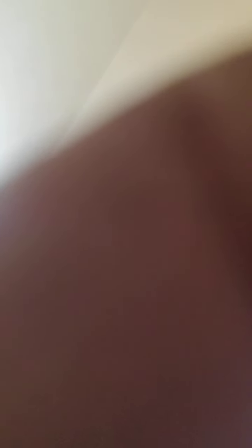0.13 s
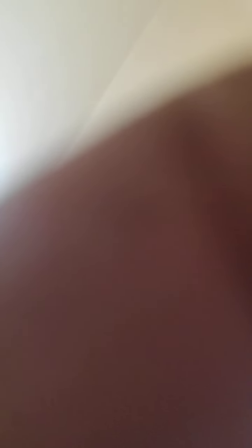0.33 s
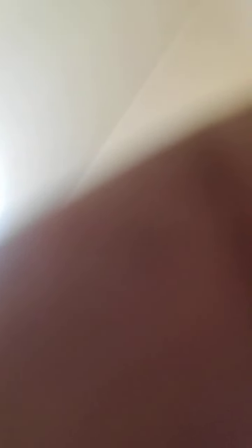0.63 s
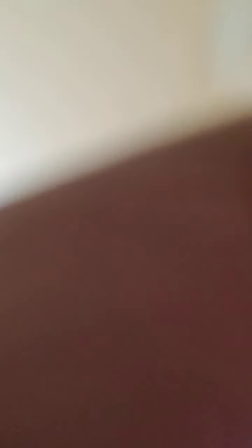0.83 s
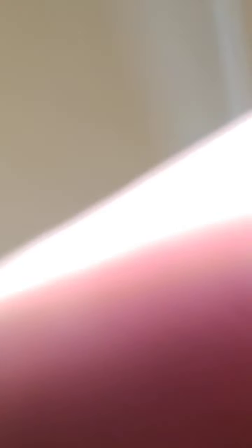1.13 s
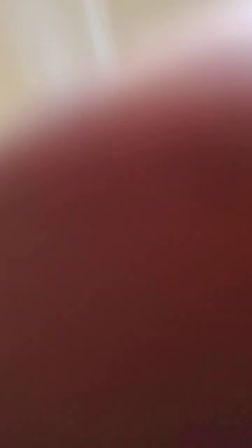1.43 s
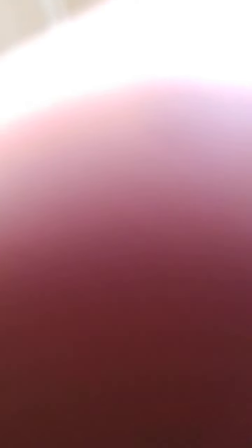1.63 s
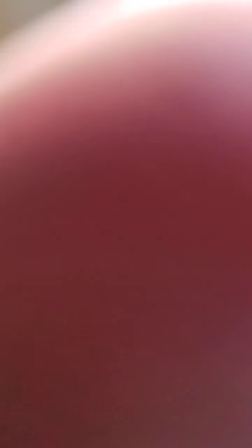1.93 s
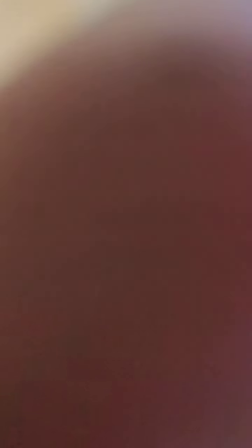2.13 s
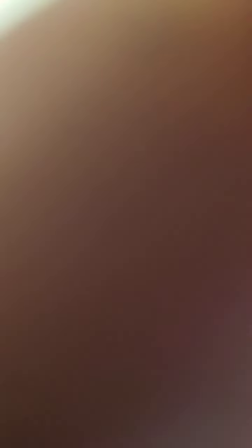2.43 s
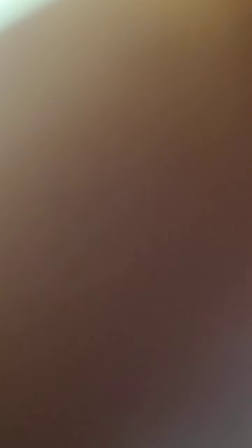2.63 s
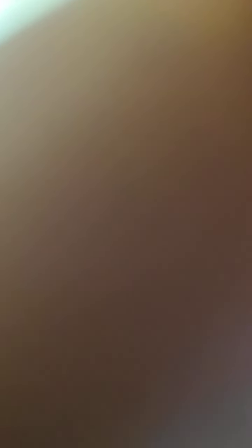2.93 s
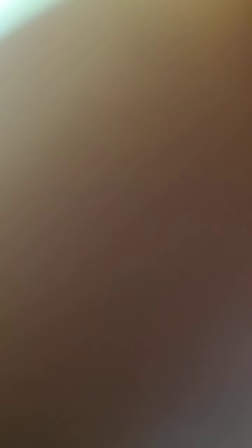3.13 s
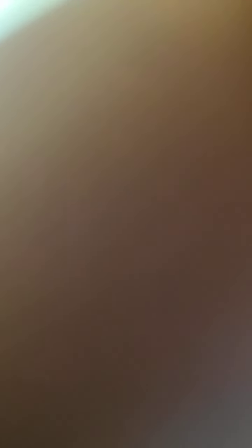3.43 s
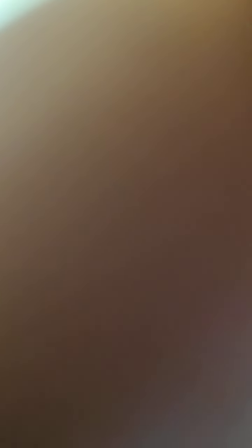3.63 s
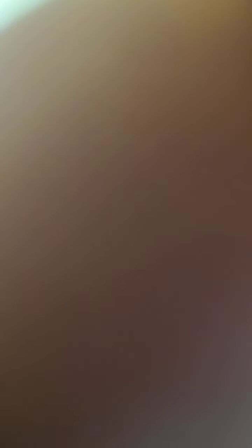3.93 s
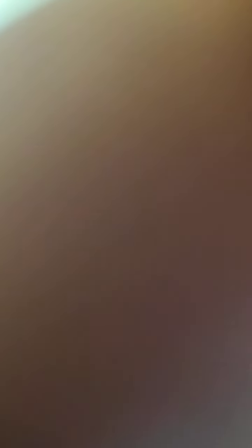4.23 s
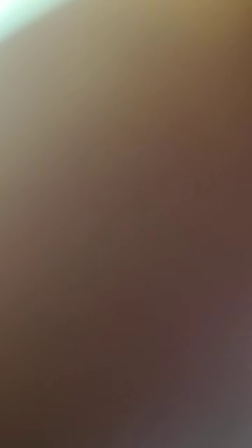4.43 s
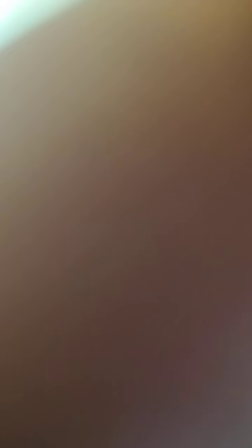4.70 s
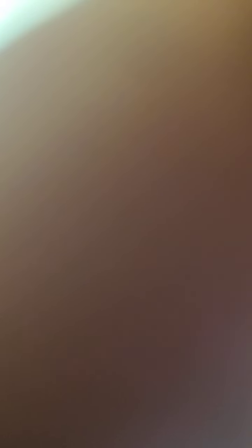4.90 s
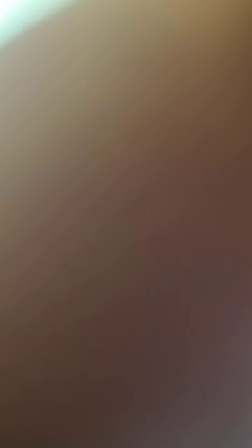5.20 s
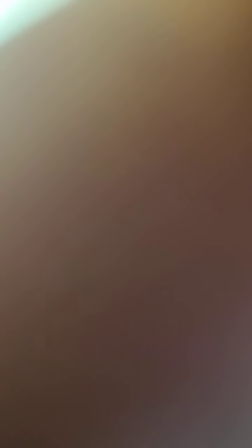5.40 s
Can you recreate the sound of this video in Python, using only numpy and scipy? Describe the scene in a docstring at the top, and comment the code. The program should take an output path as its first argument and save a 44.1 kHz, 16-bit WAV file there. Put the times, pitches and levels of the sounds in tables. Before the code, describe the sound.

A folding knife snaps loudly close by, then gives lighter metal clicks and ticks, over soft handling rustle and a faint room hum.

```python
"""Folding knife in a small hard room

A knife is snapped and handled close to a phone's two microphone ports. Each click is a burst of tiny
metal contacts ringing the knife, and the walls return it. The handle knocks on the hand, the pivot
grates, fingers rustle, a palm drags on the phone and air puffs on the left port.
Behind it, mains hum and a far engine sit in the room's low rumble."""
import sys
import numpy as np
from scipy import signal
from scipy.fft import rfft, irfft
from scipy.io import wavfile
from scipy.ndimage import uniform_filter1d

SR = 44100
rng = np.random.default_rng(int(sys.argv[2]) if len(sys.argv) > 2 else 0)


def unload_wav(signal):
    """Save mono or channel-first audio to the path in sys.argv[1] as 16-bit WAV at rate SR, clipped to [-1, 1]."""
    wavfile.write(
        sys.argv[1],
        SR,
        np.round(np.clip(np.atleast_2d(signal).T, -1, 1) * 32767).astype(np.int16),
    )


N = 245195

# Knife clicks, close up. Each row: start in seconds, level in dB, left minus right in dB, thud, handle
# and edge in dB against the blade's ring, loudest ring in Hz, steel ping in Hz, seconds for the contacts
# to fall 60 dB, room send in dB.
CLICKS = [(0.2646, -61.5, 0, 6, 3, 2, 8600, 3200, 0.005, -11.5),
          (1.2059, -11, 9, -27.5, -11, -6.5, 7650, 4910, 0.0088, -22.5),
          (1.26, -7.5, -2, -35, -12, -2.5, 6830, 4560, 0.0078, -21.5),
          (1.269, -11, -6, -38, -29, -12.5, 7000, 6900, .0042, -42),
          (1.5802, -6, -2, -22, -19.5, -1.5, 7500, 3970, .0055, -22.5),
          (1.5847, -13, -13, -35, -24, -16.5, 6090, 4600, 0.0031, -15.5),
          (1.5862, -12, -13.5, -44, -30, -15, 7300, 4600, .0035, -29.5),
          (1.924, -47.5, 3.5, -33.5, -20.5, -0.5, 5740, 5400, 0.0065, -18),
          (2.0594, -43, -0.5, -20, -8, -16, 5480, 3270, 0.0059, -19.5),
          (2.065, -46, 4, -14, -26.5, -10.5, 5530, 5200, 0.0076, -18.5),
          (2.0973, -44, 1.5, -20, -17, -5, 8300, 3260, 0.0052, -34),
          (2.197, -54, -2, -21, -14.5, -7, 5800, 3900, .025, -14.5),
          (2.3885, -52.5, 3, -6.5, -17.5, -4, 7900, 3905, 0.014, -17.5),
          (2.7206, -50.5, 1, -13.5, -21, -9, 7530, 4790, 0.006, -17),
          (2.8876, -54.5, 2, -10.5, -22, -1.5, 8580, 3300, 0.0085, -12.5),
          (3.1736, -50, -1.5, -18.5, -7, -22.5, 5500, 4550, 0.0071, -17),
          (3.9322, -23, 6, -19, -12, -11, 7140, 6900, 0.0067, -21),
          (3.9449, -28, 13, -17.5, -22, -10.5, 7060, 4400, 0.004, -14),
          (3.948, -32, 10, -24, -30, -23, 7140, 3700, 0.0063, -25),
          (4.1326, -22, 8.5, -14, -19, -10.5, 6030, 4400, 0.0081, -19),
          (4.139, -34, 0, -13, -12, -27, 5800, 5100, 0.0054, -12.5),
          (4.2516, -39.5, 6, -6, -11.5, -10, 5800, 5210, 0.02, -5.5),
          (4.271, -35.5, 7, -13, -7.5, -4, 7200, 4400, 0.013, -10.5),
          (4.3746, -44, 10, 3, 3.5, -5.5, 4680, 4940, 0.011, -9),
          (4.4718, -49, 5, -39, -24.5, -9, 6980, 3880, 0.0067, -17),
          (4.666, -39.5, -2.5, -37, -27, -3, 9010, 3880, 0.011, -17.5),
          (4.683, -39.5, -2, -44, -25, -17.5, 7250, 3850, .0091, -21.5),
          (4.868, -57.5, -1.5, -21.5, -11, -15, 7930, 3870, 0.03, -25.5),
          (5.1635, -32.5, -1, -35, -30, -1, 7400, 3350, 0.0086, -18.5),
          (5.176, -48, -20.5, -19.5, -24.5, -13, 7310, 5140, 0.0056, -14),
          (5.3987, -43.5, -3, -28.5, -21, -3, 7300, 4000, 0.01, -18),
          (5.432, -49.5, 3, -35, -10, -8, 5250, 5530, 0.035, -14),
          (5.464, -41, 0, -19, -14.5, -14, 7900, 6970, .028, -15.5)]
# Resonances of a click as the ports hear it. Each row: centre in Hz, width in Hz, relative level in dB.
BLADE_MODES = [(3900, 900, -9.5), (5800, 2300, -7), (7304, 1600, -0.5), (8880, 1650, -6)]
EDGE_MODES = [(11100, 2400, -7.5), (12000, 1100, -9.5), (13800, 400, 0.5)]
HANDLE_MODES = [(1203, 1480, -2), (1734, 250, 0), (2706, 930, -7.5), (3300, 480, -7.5)]
HAND_THUD_MODES = [(171.5, 580, 4), (400, 600, -1.1), (800, 67, -6.5)]
# Decay of the walls' return. Each row: frequency in Hz, time to fall 60 dB as a multiple of ROOM_BASE_S.
ROOM_DECAY = [(300, 1.4), (1000, 1.6), (2000, 1.9), (4000, 2.02), (7500, 1.81), (14000, 1.83)]
# Tone of the walls' return. Each row: frequency in Hz, gain in dB.
ROOM_COLOUR = [(300, 1.5), (1000, -6.5), (3000, 2), (7500, -4), (11000, 0.5), (14000, -2)]
# The holding hand shades the ports from the room. Each row: time in seconds, left minus right in dB.
HAND_SHADE = [(.3, 2), (1.2, -3), (1.27, -3), (1.58, -12), (1.92, 2), (2.4, -3), (3.2, -4), (3.94, -3),
              (4.14, -3), (4.27, -2), (4.68, -5.5), (5.17, -1), (5.46, -5)]
# The handle knocks on the hand. Each row: start in seconds, peak in dB, pitch in Hz, left minus right in dB.
KNOCKS = [(1.129, -58, 400, 15), (1.393, -48.5, 595, 13), (3.943, -44, 112, 6), (4.3755, -35, 1130, -4),
          (5.356, -52, 930, 2), (5.458, -51, 800, 3)]
# The pivot grates as the blade turns. Each row: start in seconds, hold in seconds, level in dB.
PIVOT_GRATES = [(3.35, 0.037, -80), (4.64, .03, -76.5), (4.684, .004, -67.5), (4.865, 0.018, -78),
                (5.17, 0.012, -70), (5.21, 0.018, -69.5), (5.31, .004, -75.5), (5.398, 0.094, -71)]
# The pivot's resonances. Each row: centre in Hz, width in Hz, relative level in dB.
PIVOT_MODES = [(1840, 156, 1), (2350, 230, -10), (4070, 110, -10.5), (6050, 770, -3)]
# Fingers and cloth rub. Each row: start in seconds, hold in seconds, level in dB, left minus right in dB.
RUSTLE_STROKES = [(.268, 0.093, -67.5, -0.5), (.41, 0.18, -75, -1), (.55, 0.28, -66, 0),
                  (.86, 0.19, -64.5, 0.5), (1.11, 0.12, -60.5, 0), (1.54, 0.066, -61, 4.5),
                  (1.77, 0.066, -64, 7.5), (3.335, 0.044, -66.5, -1), (2.165, .02, -71, -5.5),
                  (4.48, 0.12, -73.5, -2), (5.36, .03, -72, -2)]
# Tone of the rubbing. Each row: frequency in Hz, relative level in dB.
RUSTLE_COLOUR = [(710, -49), (1200, -5.5), (1290, -17), (1400, -9), (3370, -8.5), (4510, -5.5), (8040, -3),
                 (14200, -10.5)]
# The palm drags along the phone. Each row: start in seconds, hold in seconds, level in dB.
PALM_DRAGS = [(2.32, 0.068, -75)]
# Air on the ports. Each row: start in seconds, hold in seconds, level in dB before each port's gain.
AIR_PUFFS = [(.97, 0.024, -52.5), (1.045, 0.017, -49), (1.095, 0.012, -45), (1.14, 0.014, -50),
             (1.24, 0.059, -60.5), (1.98, 0.052, -62), (2.11, .02, -54), (2.19, 0.0076, -58.5),
             (2.44, .04, -61), (2.61, 0.046, -61)]
# The far engine. Each row: time in seconds, pitch in Hz, level in dB, level at half the pitch in dB.
ENGINE = [(.75, 128, -83, -71), (.9, 127, -65, -71), (1.5, 132, -66.5, -65), (1.7, 133, -73.5, -65),
          (2.2, 134, -67, -66), (2.8, 139, -73, -73.5), (3.8, 145, -82.5, -66.5),
          (4.2, 141.5, -85.5, -75.5), (4.6, 134, -87, -69), (5.2, 135.7, -89.5, -67.5),
          (5.5, 136, -83.5, -73.5)]
# Mains hum. Each row: frequency in Hz, rms level in dB.
MAINS_LINES = [(150, -73), (200, -72)]
# Rumble and hiss of the room tone. Each row: frequency in Hz, relative level in dB.
FLOOR_COLOUR = [(8.8, -35), (15, -1), (144, -12), (172, -19), (204, -15.5), (222, -16), (249, -15),
                (372, -21), (556, -25.5), (807, -28.5), (1210, -33.5), (14200, -37.5)]
# How alike the ports hear the room tone. Each row: frequency in Hz, likeness from 0 to 1.
FLOOR_LIKENESS = [(60, 0.72), (130, 0.9), (290, 0.7), (630, 0.3), (1370, 0)]
# Balance of the room tone. Each row: frequency in Hz, left minus right in dB.
FLOOR_BALANCE = [(60, -1.5), (110, -1.5), (200, 4), (370, 3.5), (680, 1), (1260, 2.5), (2310, 0.5),
                 (4250, 0), (7820, -3), (14400, 4.5)]

SIDES = np.array([[1], [-1]])  # left, right
SPAN, LEAD = 1 << 14, 256  # samples: one click with its tail, the lead-in to its first contact
RISE_SHARE = 0.11  # rise time over contact decay time: softer, longer contacts build up more slowly
BOUNCE_DB, BOUNCE_STRETCH = -19, 4.06  # small rebounds: level, how many times longer they last
SHARED_CONTACTS, RIGHT_LAG_S = 0.13, 0.0004  # the ports face different parts of the knife
LOUDEST_WIDTH_HZ, LOUDEST_DB, LOUDEST_ROOM_DB = 580, 5, 0.5  # this ring stands out less off the walls
EDGE_T60_S, EDGE_LEFT_DB = 0.0055, 6  # the brightest part is brief and beams at the left port
PING_T60_S, PING_DB = 0.02, -11.5
EDGE_ROOM_DB, THUD_ROOM_DB = -8, -8.5  # the thud travels in the hand, so less reaches the walls
ROOM_BASE_S, ROOM_ONSET_S, TAIL_BEND = 0.18, 0.0014, 0.98
ENGINE_THIRD_DB, FLOOR_DB = -72.5, -63


def knife_clicks():
    """Close up, tiny contacts and rebounds ring the blade and jolt the hand; the walls answer."""
    out = np.zeros((2, N))
    t = np.maximum(np.arange(SPAN) - LEAD, 0) / SR
    edge_modes = resonances(EDGE_MODES)
    for s, db, pan_db, thud_db, handle_db, edge_db, ring_hz, ping_hz, t60, room_db in CLICKS:
        rise = 1 - np.exp(-(t / (RISE_SHARE * t60)) ** 2)
        envelope = rise * (undb(-60 * t / t60) + undb(BOUNCE_DB - 60 * t / t60 / BOUNCE_STRETCH))
        common, *own = rng.standard_normal((3, SPAN))
        contacts = np.sqrt(SHARED_CONTACTS) * common + np.sqrt(1 - SHARED_CONTACTS) * np.array(own)
        blade = resonances(BLADE_MODES + [(ring_hz, LOUDEST_WIDTH_HZ, LOUDEST_DB)])
        ring = irfft(rfft(contacts * envelope) * blade)
        ring /= np.linalg.norm(ring, axis=1, keepdims=True)
        edge = irfft(rfft(common * rise * undb(-60 * t / EDGE_T60_S)) * edge_modes)
        edge = edge / np.linalg.norm(edge) * panned(edge_db, EDGE_LEFT_DB)
        ping = rise * undb(-60 * t / PING_T60_S) * np.sin(2 * np.pi * ping_hz * t)  # the blade's free part
        ping *= undb(PING_DB) / np.linalg.norm(ping)
        handle = undb(handle_db) * resonances(HANDLE_MODES)
        thud = undb(thud_db) * resonances(HAND_THUD_MODES)
        push = np.roll(irfft(np.hypot(handle, thud)), LEAD + int(RISE_SHARE * t60 * SR))
        click = np.linalg.norm(envelope) * (ring + edge + ping + push)
        click[1] = np.roll(click[1], int(RIGHT_LAG_S * SR))
        mix_in(out, s - LEAD / SR, click * panned(db, pan_db))

        room_blade = resonances(BLADE_MODES + [(ring_hz, LOUDEST_WIDTH_HZ, LOUDEST_ROOM_DB)])
        room_edge = undb(edge_db + EDGE_ROOM_DB) * edge_modes
        room_thud = undb(THUD_ROOM_DB) * thud
        radiated = np.sqrt(room_blade ** 2 + room_edge ** 2 + handle ** 2 + room_thud ** 2)
        shade_db = np.interp(s, *np.transpose(HAND_SHADE))
        mix_in(out, s, wall_return(radiated) * panned(db + room_db, shade_db))
    return out


def wall_return(radiated):
    """Diffuse tail off hard walls: noise bands, each dying at its own rate, unrelated at the two ports."""
    t = np.arange(SPAN) / SR
    edges_hz = np.geomspace(100, 20000, 9)
    band = np.digitize(np.arange(SPAN // 2 + 1) * SR / SPAN, edges_hz)
    spectrum = rfft(rng.standard_normal((2, SPAN))) * radiated * undb(at_bins(ROOM_COLOUR, SPAN))
    t60 = ROOM_BASE_S * at_bins(ROOM_DECAY, SPAN)
    tail = 0
    for k in range(1, len(edges_hz)):
        decay = undb(-30 * (2 * t / t60[band == k].mean()) ** TAIL_BEND)
        tail = tail + irfft(spectrum * (band == k)) * decay
    return tail * (1 - np.exp(-(t / ROOM_ONSET_S) ** 2))


def handle_knocks():
    """Soft blows on the hand: a short push into one heavily damped resonance."""
    out = np.zeros((2, N))
    push = np.exp(-np.arange(2048) / SR / 0.0005)
    for s, db, hz, pan_db in KNOCKS:
        knock = resonate(push, hz, q=1.2)
        mix_in(out, s, knock / np.abs(knock).max() * panned(db, pan_db))
    return out


def pivot_grating():
    """Stick-slip grit rings the pivot's resonances."""
    grit = rng.standard_normal((2, N)) * undb(5.2 * wander(150))
    ring = sum(undb(db) * resonate(grit, hz, q=hz / width) for hz, width, db in PIVOT_MODES)
    ring /= np.std(resonate(ring, 1850, q=3.7))  # the band round the lowest ring sets the level
    return ring * strokes(PIVOT_GRATES, rise_db_s=800, fall_db_s=450)


def finger_rustle():
    """Fingers and cloth near the microphones: dense friction noise with a slight grain."""
    friction = rng.standard_normal((2, N)) * undb(wander(47))
    rustle = irfft(rfft(friction) * undb(at_bins(RUSTLE_COLOUR, N)), N)
    return unit_rms(rustle) * strokes(RUSTLE_STROKES, rise_db_s=404, fall_db_s=302)


def palm_drag():
    """Handling noise: dull skin friction carried through the phone's case."""
    return band_noise(hz=[380, 1400], order=1) * strokes(PALM_DRAGS, rise_db_s=80, fall_db_s=65.5)


def air_puffs():
    """Low turbulence buffets the left port as the phone swings; a little reaches the right."""
    turbulence = band_noise(hz=[12, 45], order=2)
    port_gain = undb([[5], [-8]])
    return turbulence * strokes(AIR_PUFFS, rise_db_s=367, fall_db_s=400) * port_gain


def far_engine():
    """A distant engine drones: wavering tones at its pitch, a half and a third of it."""
    times, *columns = np.transpose(ENGINE)
    hz, db, half_db = [np.interp(np.arange(N) / SR, times, column) for column in columns]
    phase = 2 * np.pi * np.cumsum(hz * (1 + 0.0023 * wander(2.7))) / SR
    tones = undb(db + 2.5 * wander(11)) * np.sin(phase)
    tones += undb(half_db + 1.9 * wander(3.1)) * np.sin(phase / 2)
    tones += undb(ENGINE_THIRD_DB + 2.1 * wander(6.7)) * np.sin(phase / 3)
    return np.sqrt(2) * tones


def mains_hum():
    """Two mains lines, steady in pitch and drifting a little in level."""
    t = np.arange(N) / SR
    return np.sqrt(2) * sum(undb(db + wander(2.4)) * np.sin(2 * np.pi * hz * t) for hz, db in MAINS_LINES)


def room_tone():
    """Room rumble largely shared by both ports, and each microphone's own hiss."""
    mid, side = rfft(rng.standard_normal((2, N)))
    likeness = at_bins(FLOOR_LIKENESS, N)
    pair = np.sqrt(1 + likeness) * mid + SIDES * np.sqrt(1 - likeness) * side
    colour = panned(at_bins(FLOOR_COLOUR, N), at_bins(FLOOR_BALANCE, N))
    return undb(FLOOR_DB) * unit_rms(irfft(pair * colour, N))


def resonances(table):
    """Gain of overlapping resonances at the bins of one click's spectrum, mean power 1."""
    f = np.arange(SPAN // 2 + 1) * SR / SPAN + 1
    power = sum(undb(2 * db) / (1 + ((f - hz ** 2 / f) / width) ** 2) ** 2 for hz, width, db in table)
    return unit_rms(np.sqrt(power))


def resonate(x, hz, q):
    """A signal through one resonance."""
    return signal.lfilter(*signal.iirpeak(hz, q, SR), x)


def strokes(rows, rise_db_s, fall_db_s):
    """Gain of gestures that swell up to their start, hold and fade; their powers add."""
    t, power = np.arange(N) / SR, 0
    for s, hold_s, db, *pan_db in rows:
        below_db = rise_db_s * np.maximum(s - t, 0) + fall_db_s * np.maximum(t - s - hold_s, 0)
        power = power + panned(db - below_db, sum(pan_db)) ** 2
    return np.sqrt(power)


def band_noise(hz, order):
    """A band of noise at rms 1, unrelated at the two ports."""
    bandpass = signal.butter(order, hz, "band", fs=SR, output="sos")
    return unit_rms(signal.sosfilt(bandpass, rng.standard_normal((2, N))))


def wander(rate_hz):
    """Smooth random drift at rms 1."""
    hold = int(SR / rate_hz)
    steps = np.repeat(rng.standard_normal(N // hold + 1), hold)
    return unit_rms(uniform_filter1d(uniform_filter1d(steps, hold), hold)[:N])


def at_bins(table, n):
    """A table of Hz and value read at the bins of an n-point spectrum."""
    hz, value = np.transpose(table)
    return np.interp(np.log(np.arange(n // 2 + 1) * SR / n + 1), np.log(hz), value)


def mix_in(track, s, sound):
    """Mixes a short sound in at s seconds."""
    i = int(s * SR)
    track[:, i:i + sound.shape[1]] += sound[:, :N - i]


def panned(db, pan_db):
    """Left and right gains, pan_db apart around a level."""
    return undb(db + SIDES * pan_db / 2)


def undb(db):
    """Gain of a dB value."""
    return 10 ** (np.asarray(db) / 20)


def unit_rms(x):
    """Scaled to rms 1."""
    return x / np.sqrt(np.mean(x ** 2))


def scene():
    """Everything at the two ports, from the knife up close to the back of the room."""
    knife = knife_clicks() + handle_knocks() + pivot_grating()
    handling = finger_rustle() + palm_drag() + air_puffs()
    hum = (far_engine() + mains_hum()) * panned(0, pan_db=1.3)
    return knife + handling + hum + room_tone()


def record(dry):
    """The phone rounds the loudest peaks and cuts the top."""
    drive, top_hz, steeper_hz = 2.1, 14350, 16200
    rounded = np.tanh(drive * dry) / drive
    top_cut = signal.ellip(8, 0.5, 38, top_hz, fs=SR, output="sos")
    steeper_cut = signal.ellip(8, 0.5, 60, steeper_hz, fs=SR, output="sos")
    return signal.sosfilt(np.vstack([top_cut, steeper_cut]), rounded)


dry = scene()
out = record(dry)
unload_wav(out)
```